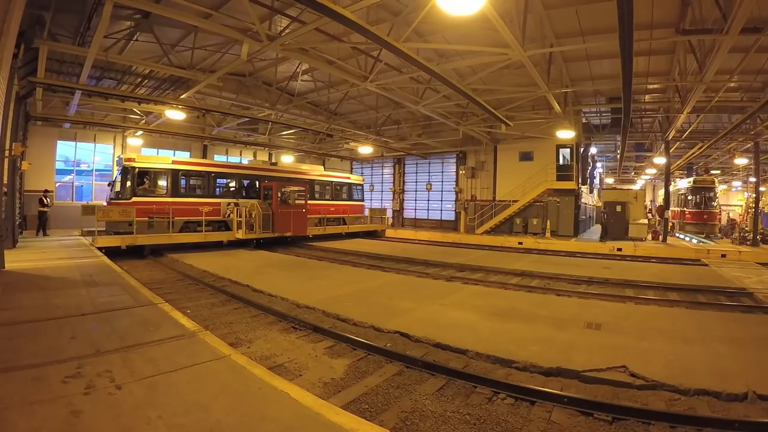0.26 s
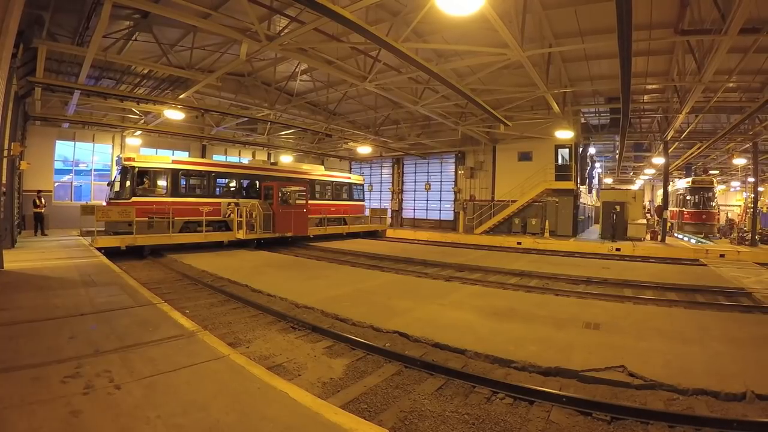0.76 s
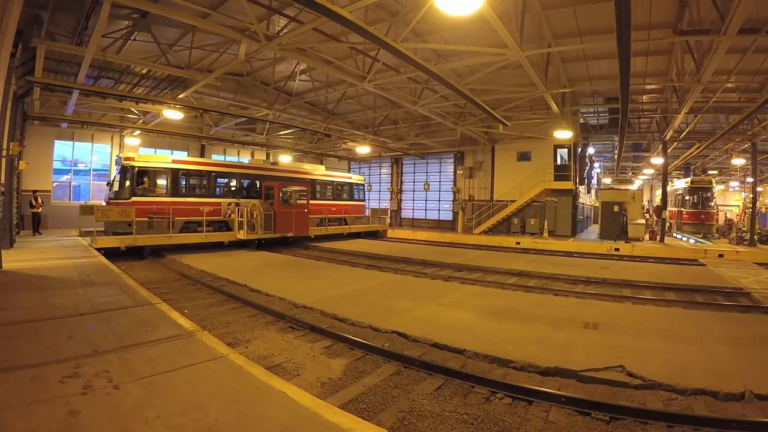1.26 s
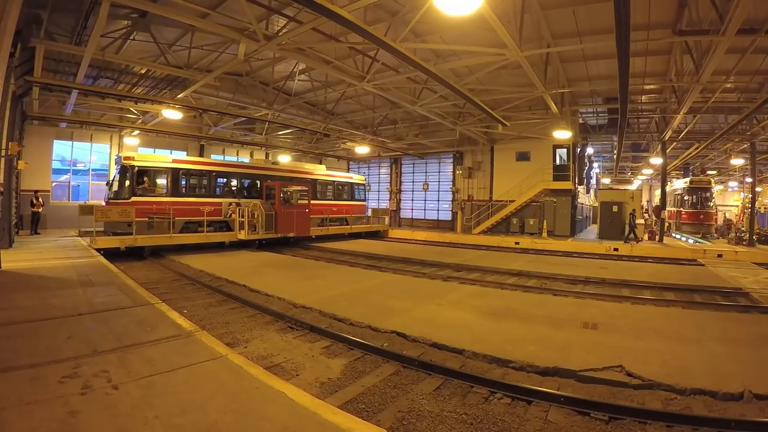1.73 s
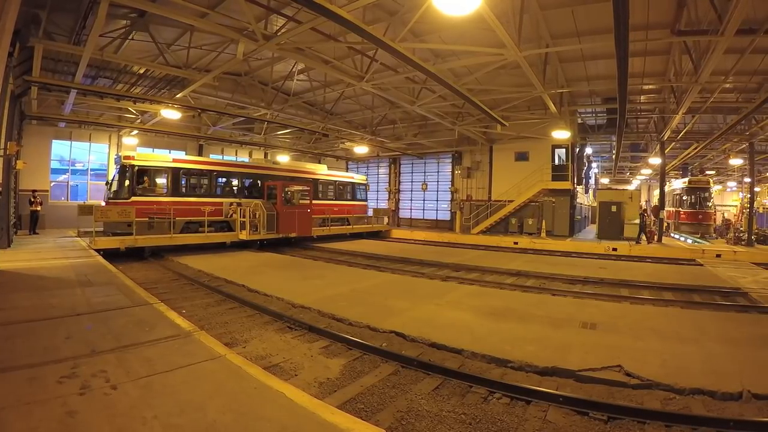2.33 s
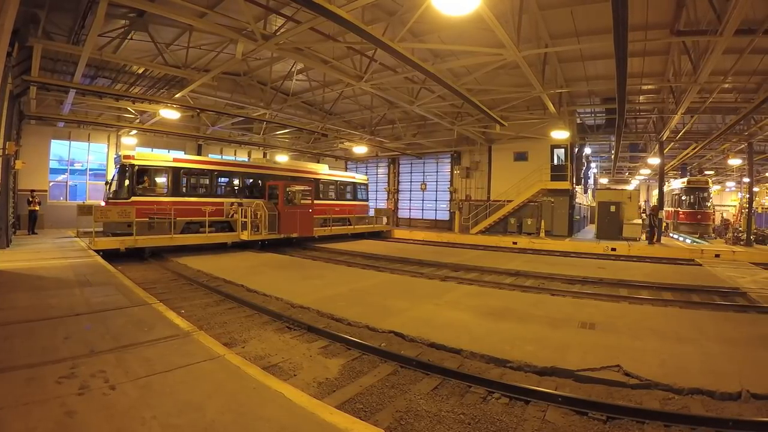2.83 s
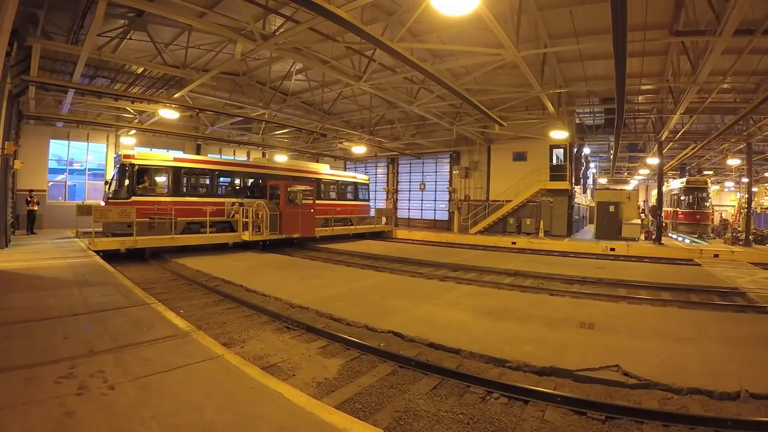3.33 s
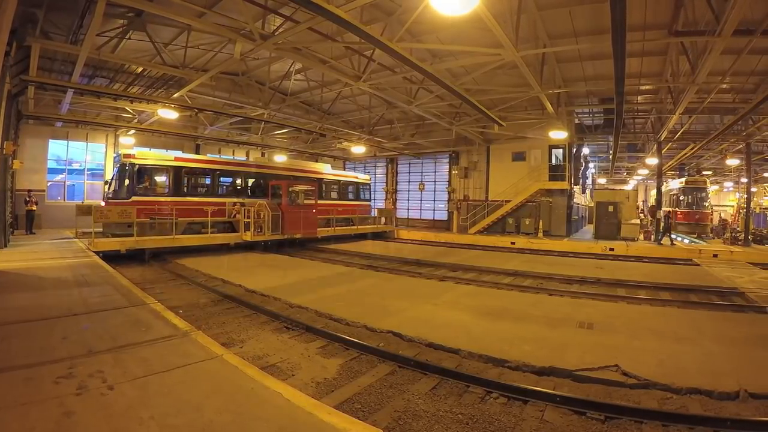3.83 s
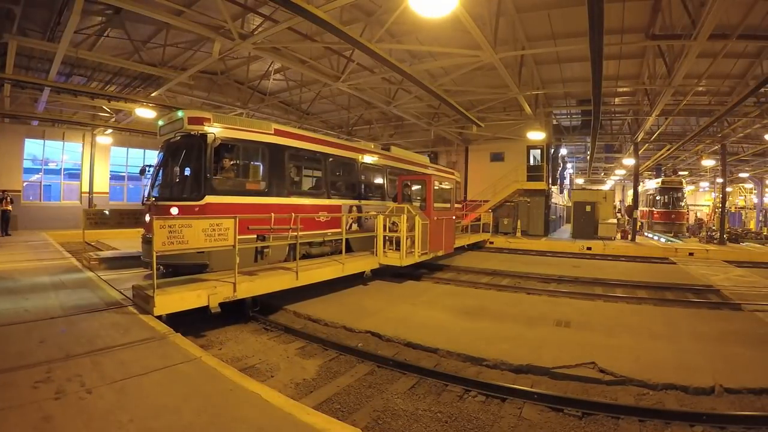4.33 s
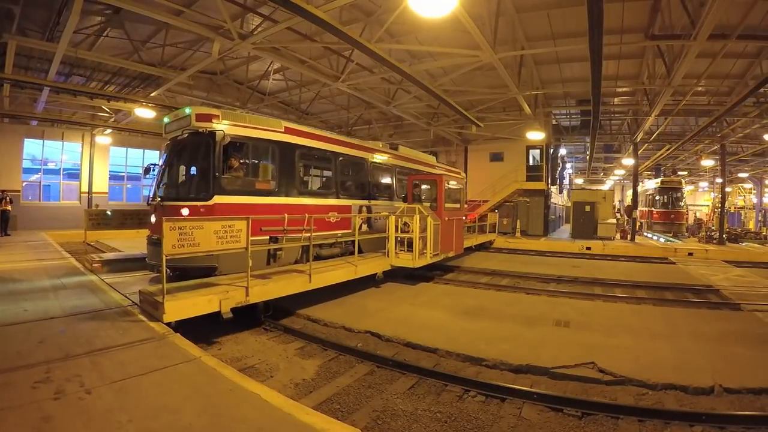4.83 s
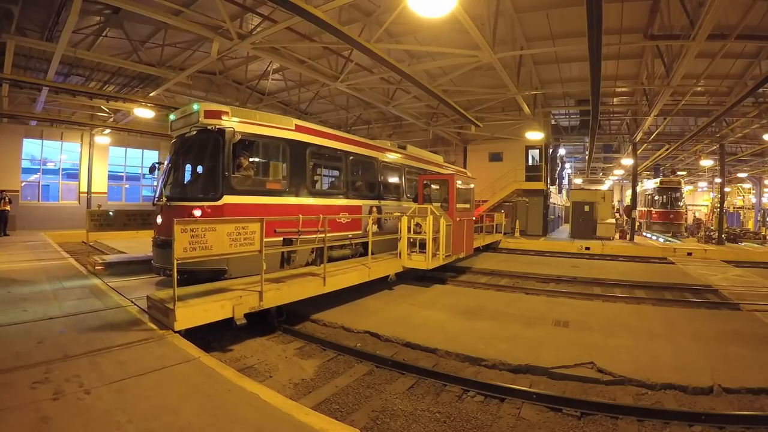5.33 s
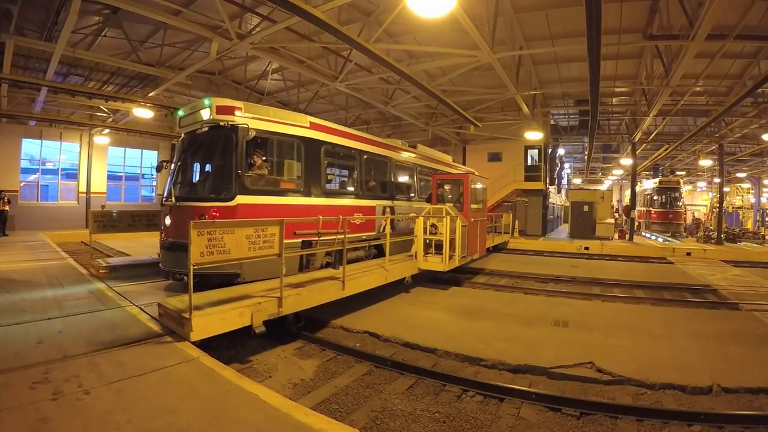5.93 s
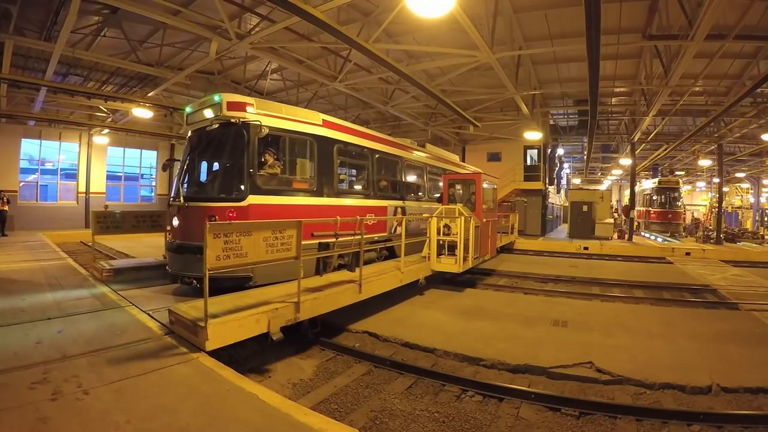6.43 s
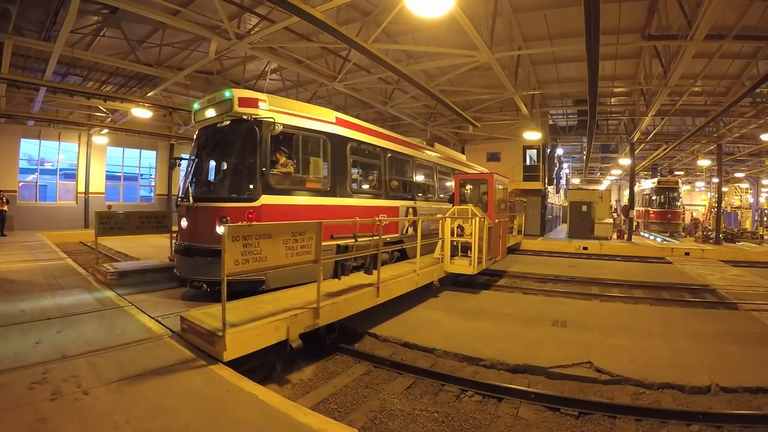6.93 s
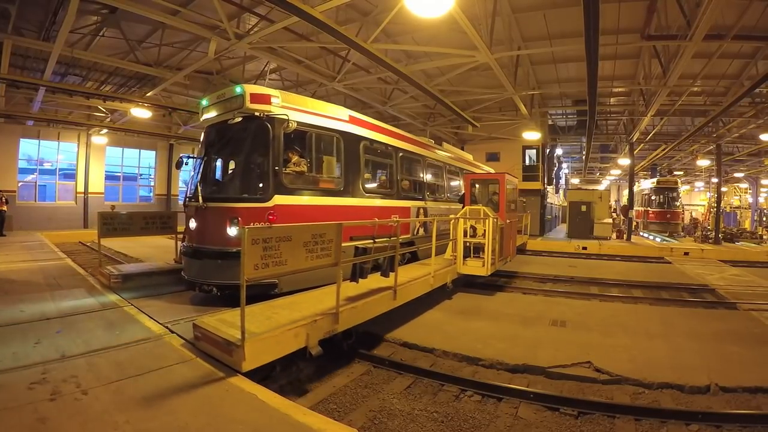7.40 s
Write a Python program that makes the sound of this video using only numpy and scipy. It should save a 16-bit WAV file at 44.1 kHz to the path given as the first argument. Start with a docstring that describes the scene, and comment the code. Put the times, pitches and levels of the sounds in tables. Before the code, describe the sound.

A fixed microphone in an echoing hall hears wavering low gear hum over deep rumble as a streetcar rides a moving table. Scattered metal clatters, a soft thud, then a very high squeal lasting about a second. Air vents in a bright burst, the rumble comes near and swells, steel rubs and rattles, a flange chirps sharply, and rolling rumble continues to the end with final clanks.

```python
"""A transfer table carries a streetcar through a workshop hall, at first far off: mesh-order tones hum over
noise rumble while an earlier squeal dies away and noise-burst clanks ring the steel deck. At 2.1 s the table
jolts over a rail joint; from 2.8 s gliding sines squeal; at 4 s an air valve puffs filtered noise.
The gears then fade and the table draws near: load swells the rumble, grainy noise rubs, clanks return,
and at 5.5 s a flange chirps. A noise tail spreads the clanks and the chirp through the hall."""
import sys
import numpy as np
from scipy import signal
from scipy.fft import rfft, irfft, next_fast_len
from scipy.io import wavfile
from scipy.ndimage import uniform_filter1d, map_coordinates

SR = 44100
rng = np.random.default_rng(int(sys.argv[2]) if len(sys.argv) > 2 else 0)


def ratio(d):
    """dB to gain"""
    e = np.asarray(d, float) / 20
    return 10 ** e


def int16_out(signal):
    """Quantize to a 16-bit WAV file."""
    q = np.round(np.clip(np.atleast_2d(signal).T, -1, 1) * 32767)
    wavfile.write(sys.argv[1], SR, q.astype(np.int16))


N = 337806
TIME = np.arange(N) / SR


def rms_one(x):
    """Scale to unit rms."""
    return x / np.sqrt(np.mean(x ** 2) + 1e-20)


def in_time(rows):
    """Columns joined by straight lines in time."""
    s, *columns = np.transpose(rows)
    return [np.interp(TIME, s, column) for column in columns]


def at_hz(points, hz):
    """Read a table on a log-frequency axis."""
    table_hz, values = np.array(points).T[:2]
    return np.interp(np.log(hz + 1), np.log(table_hz), values)


def sounding(rows, fade_s):
    """One while the table lasts, fading outside both ends."""
    return np.clip(np.minimum(TIME - rows[0][0], rows[-1][0] - TIME) / fade_s + 1, 0, 1)


def until(s, fade_s):
    """One, then fading out from a moment."""
    return np.clip((s - TIME) / fade_s + 1, 0, 1)


def swells(starts_s, lengths_s, levels_db, edge_s):
    """Sum of humps with rounded edges; those shorter than two edges peak below their level."""
    out = np.zeros(N)
    for s, length_s, db in zip(starts_s, lengths_s, levels_db):
        first, last = round((s - edge_s) * SR), round((s + length_s + edge_s) * SR)
        a, b = np.clip([first, last], 0, N)
        inside_s = np.minimum(TIME[a:b] - s, s + length_s - TIME[a:b])
        ramp = np.clip(inside_s / (2 * edge_s) + .5, 0, 1)
        out[a:b] += ratio(db) * ramp * ramp * (3 - 2 * ramp)
    return out


def drift(rate):
    """Smooth random curve through 2 * rate normal knots per second."""
    knots = rng.standard_normal(2000)
    return map_coordinates(knots, [np.clip(TIME * rate * 2 + 4, 0, 1990)], order=3)


def noise(spectrum, evenness=0):
    """Unit-rms noise of a given colour; evenness flattens its own chance swells."""
    size = next_fast_len(N)
    colour = ratio(at_hz(spectrum, np.arange(size // 2 + 1) * SR / size))
    x = irfft(rfft(rng.standard_normal(size)) * colour, size)
    if evenness:
        envelope = np.abs(signal.hilbert(x))
        x = x / (envelope + 0.19 * x.std()) ** evenness
        x = irfft(rfft(x) * (colour > colour.max() * 1e-3), size)   # back inside its band
    return rms_one(x[:N])


def resonance(x, hz, width_hz):
    """Two-pole band-pass, gain 1 on top."""
    r = np.exp(-np.pi * width_hz / SR)
    zeros = [(1 - r * r) / 2, 0, (r * r - 1) / 2]
    poles = [1, -2 * r * np.cos(2 * np.pi * hz / SR), r * r]
    return signal.lfilter(zeros, poles, x + 1e-18)


def tone(hz, level_db, waver_hz, waver_db, rate):
    """A sine, level as rms, whose pitch and level waver."""
    phase = 2 * np.pi * (np.cumsum(hz + waver_hz * drift(rate)) / SR + rng.random())
    return np.sqrt(2) * ratio(level_db + waver_db * drift(rate)) * np.sin(phase)


# The table draws near and the rails take its weight. Each row: time in s, nearness in dB, rail load in dB.
TRAVEL = [(0, 0.5, 0.5), (.6, 0.5, 0.5), (1.3, 1, -1.5), (1.8, 0.5, 2), (2.4, 1.5, 3.5), (3.1, 0.5, 0),
          (3.95, 0.5, 6), (4.2, 6, 5), (4.5, 6.5, 10.5), (5.05, 4.5, 16.5), (5.45, 7.5, 10.5),
          (5.75, 9.5, 6), (6.25, 6, 8.5), (6.7, 4, 4.5), (7.1, 6, 1.5), (7.66, 5.5, -0.5)]


def travelling(base_db, nearness_share, load_share):
    """Gain of a steady layer as nearness and load change."""
    nearness_db, load_db = in_time(TRAVEL)
    return ratio(base_db + nearness_share * nearness_db + load_share * load_db)


# Tooth-mesh rate. Each row: time in s, pitch in Hz.
MESH_RATE = [(0, 107), (.5, 104.1), (1.5, 105), (2, 101.5), (2.7, 100.5), (3.7, 101.5), (4.2, 100.6),
             (4.9, 100)]
# The teeth bite harder. Each row: start in s, length in s, second order in dB, third order against it in dB.
BITES = [(0.108, 0.044, -42.5, -27), (0.187, 0.046, -41, -36), (0.304, 0.24, -38, -10.5),
         (0.634, 0.087, -45, -3), (1.084, 0.29, -40.5, -23.5), (1.425, 0.15, -38, -22),
         (1.643, 0.04, -43, -29), (1.88, 0.21, -42, -21), (2.183, 0.15, -38, -24), (2.37, 0.033, -42, -7),
         (2.558, 0.05, -39.5, -35), (2.657, 0.13, -40, -20), (2.9, 0.18, -42.5, -21),
         (3.186, 0.073, -42.5, -20), (3.341, 0.124, -44, -23), (3.548, 0.2, -35, -16),
         (3.797, 0.26, -39.5, -39)]
# Frame hum near the mesh rate. Each row: time in s, pitch in Hz.
FRAME_PITCH = [(0, 108), (.5, 112), (.85, 102), (1.2, 110), (1.8, 100), (2.3, 108), (2.9, 114), (3.75, 115),
               (4.1, 101), (5.0, 102.5), (5.3, 110), (5.7, 102)]
# The frame hums up. Each row: start in s, length in s, level in dB.
FRAME_SWELLS = [(0.364, 0.035, -36), (0.523, 0.058, -35), (0.738, 0.037, -38.5), (0.82, 0.034, -39),
                (1.328, 0.086, -38), (2.059, 0.027, -37), (2.138, 0.26, -37), (2.66, 0.13, -42.5),
                (2.893, 0.14, -39.5), (3.059, 0.065, -37), (3.24, 0.04, -41), (3.48, 0.32, -38),
                (3.904, 0.046, -37), (4.131, 0.26, -42), (4.45, 0.18, -38.5), (4.716, 0.36, -33),
                (5.188, 0.076, -49), (5.364, 0.082, -40), (5.494, 0.054, -37), (5.578, 0.19, -33.5),
                (5.893, 0.034, -35)]


def gears():
    """Orders of the tooth-mesh frequency, swelling as the teeth bite, and the frame humming near the mesh rate."""
    idle_second_db, idle_third_db, idle_frame_db = -49, -60.5, -43
    mesh_hz, nearness_db = in_time(MESH_RATE)[0], in_time(TRAVEL)[0]
    s, length_s, db, third_db = np.transpose(BITES)
    second_gain = ratio(idle_second_db) + swells(s, length_s, db, edge_s=0.026)
    third_gain = ratio(idle_third_db) + swells(s, length_s, db + third_db, edge_s=0.067)
    second = second_gain * tone(2 * mesh_hz, 0, waver_hz=2.39, waver_db=3.0, rate=12)
    third = third_gain * tone(3 * mesh_hz, 0, waver_hz=2.446, waver_db=1.5, rate=13)
    fifth = tone(5 * mesh_hz, -76 + 2.04 * nearness_db, waver_hz=1.42, waver_db=6.0, rate=12)
    frame_gain = ratio(idle_frame_db) + swells(*np.transpose(FRAME_SWELLS), edge_s=0.045)
    frame = frame_gain * tone(in_time(FRAME_PITCH)[0], 0, waver_hz=5.3, waver_db=2.0, rate=18)
    orders = (second + third) * until(4.15, fade_s=0.32) + fifth * until(4.9, fade_s=.25)
    return orders + frame * until(5.9, fade_s=0.14)


# Wheel rumble. Each row: frequency in Hz, relative density in dB per Hz.
DEEP_COLOUR = [(9, -37.5), (15, 1), (25, -5), (40, 3), (58, -5), (75, -18), (120, -60)]
# Pit rumble. Each row: frequency in Hz, relative density in dB per Hz.
PIT_COLOUR = [(40, -24), (58, 0.5), (75, -4), (95, -6), (125, -37.5), (200, -72)]
# Frame rumble, also the jolt's. Each row: frequency in Hz, relative density in dB per Hz.
FRAME_COLOUR = [(60, -34), (95, -6), (123, -6), (182, -10), (216, -12), (260, -14.5), (320, -20.5),
                (370, -25), (430, -28.5), (560, -50), (730, -65.5)]
# The wheels labour and the deep rumble swells. Each row: start in s, length in s, level in dB.
LURCHES = [(2.307, 0.024, -28.5), (4.007, 0.067, -40), (4.222, 0.1, -30), (4.546, 0.041, -29.5),
           (4.628, 0.14, -34), (4.88, 0.056, -34), (4.967, 0.036, -42), (5.154, 0.043, -39),
           (5.27, 0.042, -29), (5.36, 0.15, -30.5), (5.589, 0.028, -22.5), (5.678, 0.065, -21.5),
           (5.804, 0.178, -36.5), (6.074, 0.15, -32.5), (6.252, 0.11, -31.5), (6.815, 0.043, -28),
           (6.892, 0.044, -29), (6.972, 0.032, -28.5), (7.039, 0.17, -30), (7.293, 0.15, -29),
           (7.518, 0.14, -31)]


def rumble():
    """Wheels, pit and frame of the loaded table: three low noises whose levels follow its travel."""
    deep_gain = travelling(-37.5, nearness_share=0, load_share=0.35)
    deep_gain = deep_gain + swells(*np.transpose(LURCHES), edge_s=0.036)
    deep = deep_gain * noise(DEEP_COLOUR, evenness=0.54)
    pit_gain = travelling(-41.5, nearness_share=0.4, load_share=0.42) * ratio(0.75 * drift(2.5))
    pit = pit_gain * noise(PIT_COLOUR, evenness=0.17)
    frame_gain = travelling(-41.5, nearness_share=0.44, load_share=0.31)
    return deep + pit + frame_gain * noise(FRAME_COLOUR, evenness=0.48)


# Two wheel modes, the lower sliding with the load.
# Each row: time in s, upper pitch in Hz, upper level in dB, lower pitch in Hz, lower level in dB.
SQUEAL = [(2.82, 7960, -75, 4260, -90), (2.87, 7900, -61.5, 4320, -76), (3.04, 7870, -55, 4260, -61.5),
          (3.25, 7842, -49.5, 4010, -65), (3.42, 7810, -50, 3930, -71), (3.54, 7760, -50, 3950, -70),
          (3.65, 7840, -52, 4280, -62), (3.78, 7825, -67.5, 4185, -77), (3.9, 7785, -80, 4185, -95)]


def squeals():
    """Stick-slip holds wheel modes singing; the contact mixes two of them into a sum tone."""
    mirror_hz, mirror_share, mirror_s = 12100, .8, 3.1
    upper_hz, upper_db, lower_hz, lower_db = in_time(SQUEAL)
    sum_hz = upper_hz + lower_hz
    upper = tone(upper_hz, upper_db, waver_hz=20.4, waver_db=3.5, rate=55)
    lower = tone(lower_hz, lower_db, waver_hz=28.1, waver_db=3.5, rate=80)
    mixed = tone(sum_hz, upper_db - 19.5, waver_hz=20.4, waver_db=4.0, rate=46)
    # from mirror_s a second tone slides against the sum, by mirror_share of its distance from mirror_hz
    opposed_hz = mirror_hz - mirror_share * (sum_hz - mirror_hz)
    mirror = tone(opposed_hz, upper_db - 25, waver_hz=25.0, waver_db=2.0, rate=46)
    mirror = mirror * (1 - until(mirror_s, fade_s=.06))
    # an earlier squeal dies away at 109 dB per s
    tail = tone(7860, -59.5 - 109 * TIME, waver_hz=20.5, waver_db=4.5, rate=55)
    return (upper + lower + mixed + mirror) * sounding(SQUEAL, fade_s=.015) + tail


# Steel blows.
# Each row: start in s, level in dB, dullness in dB per octave, rise in s, deck ring against the clatter in dB.
CLANKS = [(0.63, -54.5, 4, 0.01, -18), (1.214, -38.5, 2.5, 0.028, -22), (1.516, -56.5, -2, 0.01, -17),
          (1.839, -51, 4.5, 0.034, -15), (4.327, -38.5, 1, 0.01, -13), (4.525, -47.5, -2, 0.0096, -8),
          (4.795, -55, 3, .012, -7.5), (5.629, -41.5, 10, 0.011, -15.5), (6.436, -52.5, 3, 0.013, -13),
          (6.695, -47.5, 3, 0.013, -13.5), (7.335, -45.5, 11, 0.0079, -21), (7.44, -38.5, 0, 0.018, -15)]
# Loose steel rattling. Each row: frequency in Hz, relative density in dB per Hz.
CLATTER_COLOUR = [(900, -30), (1500, -6.5), (2000, -15), (2700, -7), (3400, -16), (4200, -3), (5200, -4.5),
                  (6500, 0), (7500, -9), (9000, -16), (11500, -35), (15000, -48)]
# Steel deck modes. Each row: frequency in Hz, relative level in dB, ring scale in s (bandwidth in Hz is 5.5 over it).
DECK = [(2196, -6, 0.13), (2436, -8.5, 0.13), (3670, -2.5, .06), (4950, -25, 0.046), (4856, -0.5, 0.42),
        (5400, -1, .08), (6600, -27, .06)]


def clanks():
    """Each blow swells a noise clatter of loose parts; the same burst, uncoloured, rings the deck modes."""
    decay_s, ragged_db = 0.048, 2.5
    out, size = np.zeros(N + SR), SR // 4
    t, hz = np.arange(size) / SR, np.arange(size // 2 + 1) * SR / size
    many_modes_db = 3.8 * rms_one(uniform_filter1d(rng.standard_normal(len(hz)), size=10))   # dense small resonances
    ragged = ratio(ragged_db * drift(45))   # the parts touch unevenly
    for s, db, dull, rise_s, ring_db in CLANKS:
        white = rng.standard_normal(size)
        shape = (1 - np.exp(-(t / rise_s) ** 2)) * np.exp(-t / decay_s)
        shape = shape * np.interp(s + t, TIME, ragged)
        tilt_db = -dull * np.log2((hz + 100) / 4000)
        colour = ratio(at_hz(CLATTER_COLOUR, hz) + tilt_db + many_modes_db)
        clatter = rms_one(irfft(rfft(white) * colour, size)) * shape
        modes = np.zeros(size)
        for mode_hz, mode_db, ring_s in DECK:
            gain = ratio(mode_db + 2 * rng.standard_normal()) * np.sqrt(ring_s * 4000)
            modes += gain * resonance(white * shape, mode_hz, 5.5 / ring_s)
        start = round(s * SR)
        out[start:start + size] += ratio(db) * (clatter + ratio(ring_db) * modes)
    return out[:N]


# Flange modes. Each row: frequency in Hz, pitch waver in Hz, level within the chirp in dB.
CHIRP_MODES = [(3080, 68, -26.5), (3770, 35, -15), (3970, 27, -21.5), (4450, 100, -26), (6200, 49, -18),
               (6580, 30, -11.5), (6784, 28, 1.5), (7130, 24, -23), (13560, 60, -35)]
# Scraping noise of the slip. Each row: frequency in Hz, relative density in dB per Hz.
SCRAPE_COLOUR = [(2300, -19), (3000, -13), (4300, -4.5), (5200, -13), (6200, -3.5), (7200, -2), (8600, -20),
                 (9300, -34), (10200, -12.5), (11500, -37), (12800, -24), (15000, -40.5)]


def chirp():
    """A flange slips for a moment: its modes sing evenly over a scrape that is strongest near the start."""
    start_s, length_s, level_db = 5.475, 0.045, -25.5
    since_s = TIME - start_s
    attack = np.clip(since_s / .008, 0, 1)
    slip = attack * np.clip((length_s - since_s) / 0.016 + 1, 0, 1)
    modes = sum(tone(hz, db, waver_hz=waver_hz, waver_db=0.5, rate=61) for hz, waver_hz, db in CHIRP_MODES)
    scrape = ratio(-9.0) * noise(SCRAPE_COLOUR) * attack * np.exp(-np.abs(since_s) / 0.041)
    return ratio(level_db) * (modes * slip + scrape)


# Air burst. Each row: frequency in Hz, relative density in dB per Hz.
AIR_COLOUR = [(1760, -37), (3000, -18), (3170, -28), (3250, -19.5), (4710, -11.5), (5970, 3), (8650, -13.5),
              (10800, -32), (15000, -40.5)]
# Thin bright jet. Each row: frequency in Hz, relative density in dB per Hz.
JET_COLOUR = [(5000, -20), (8500, 5), (12000, -7), (15000, -6)]


def puff():
    """Compressed air vents in one bright burst: the valve opens, then the pressure drains."""
    start_s, rise_s, level_db, drain_db_per_s = 4.005, 0.043, -34, 65.5
    jet_s, jet_db = 0.082, -57   # the jet holds while the valve stands open
    since_s = np.maximum(TIME - start_s, 0)
    opening = 1 - np.exp(-(since_s / rise_s) ** 2)
    burst = ratio(level_db - drain_db_per_s * since_s) * noise(AIR_COLOUR)
    jet = ratio(jet_db) * until(start_s + jet_s, fade_s=.04) * noise(JET_COLOUR)
    return opening * (burst + jet)


# Wheel flanges rub close by. Each row: start in s, length in s, level in dB.
RUSTLE = [(4.806, .18, -55), (5.065, .2, -50), (5.305, 0.27, -55.5), (5.75, 0.43, -56), (6.144, 0.45, -60),
          (6.83, .15, -50.5), (6.998, 0.25, -53), (7.22, 0.22, -53.5)]
# Rubbing steel. Each row: frequency in Hz, relative density in dB per Hz.
RUB_COLOUR = [(1760, -13), (3000, -11), (3520, -12), (4710, -7.5), (5140, -2), (6350, -7.5), (6860, -9.5),
              (9000, -23.5), (11700, -65), (19800, -120)]


def rustle():
    """Rubbing steel: grainy noise with two faint singing bands."""
    grain = noise(RUB_COLOUR) * ratio(0.37 * drift(40))
    singing = resonance(grain, 4890, 90) * ratio(-6.5)
    grain = grain + singing
    grain = grain + resonance(grain - singing, 5862, 200) * ratio(-10)
    return grain * swells(*np.transpose(RUSTLE), edge_s=0.1)


def jolt():
    """The table rolls over a rail joint: a dull boom of the whole frame, noise through one low resonance."""
    start_s, rise_s, hold_s, level_db, decay_db_per_s = 2.13, 0.022, 0.14, -32.5, 58
    boom = rms_one(resonance(noise(FRAME_COLOUR), 130, 78))
    since_s = TIME - start_s
    decay = ratio(level_db - decay_db_per_s * np.maximum(since_s - hold_s, 0))
    return np.clip(since_s / rise_s, 0, 1) * decay * boom


# Far machinery. Each row: frequency in Hz, relative density in dB per Hz.
MACHINERY_COLOUR = [(260, -17.5), (450, -15.5), (500, 0.5), (531, -30), (605, -10.5), (785, -6.5),
                    (1140, -15), (1340, -8.5), (2270, -14.5), (2820, -19), (3600, -30), (4680, -80.5),
                    (7920, -120)]
# Rail hiss. Each row: frequency in Hz, relative density in dB per Hz.
HISS_COLOUR = [(1760, -11), (3000, -10.5), (3460, -9), (4200, -1), (5920, -1), (6960, -6), (8020, -13),
               (8870, -11), (11800, -22), (13400, -30), (15100, -43)]


def wash():
    """Machinery and rail hiss: two steady noises that drift in level and grow with nearness."""
    machinery_gain = travelling(-62.5, nearness_share=1.01, load_share=0) * ratio(0.49 * drift(5.5))
    hiss_gain = travelling(-62, nearness_share=0.57, load_share=0) * ratio(0.84 * drift(6.6))
    return machinery_gain * noise(MACHINERY_COLOUR) + hiss_gain * noise(HISS_COLOUR)


# Hall reverberation. Each row: frequency in Hz, 60 dB decay time in s.
HALL_DECAY = [(500, 0.52), (2000, 1.33), (5000, 0.8), (9000, 0.51), (14000, 0.22)]


def hall(x, onset_s):
    """Diffuse tail: half-octave bands of noise that build up together and die at their own rates."""
    t, tail = np.arange(SR) / SR, 0
    for hz in 500 * 2. ** np.arange(0, 5, .5):
        band = signal.butter(2, [hz / 1.19, hz * 1.19], "band", fs=SR, output="sos")
        decay = ratio(-60 * t / at_hz(HALL_DECAY, hz))
        tail = tail + signal.sosfilt(band, rng.standard_normal(SR)) * decay
    tail = tail * (1 - np.exp(-t / onset_s))
    return signal.fftconvolve(x, tail / np.sqrt(np.sum(tail ** 2)))[:N]


def scene():
    """All sources summed; chirp and clanks are heard both directly and through the hall."""
    slip, blows = chirp(), clanks()
    slip = slip + ratio(-9.5) * hall(slip, onset_s=0.0074)
    blows = blows + ratio(-8.5) * hall(blows, onset_s=0.018)
    mix = gears() + rumble() + squeals() + blows + slip + puff() + rustle() + jolt() + wash()
    return mix[None]


def low_pass(x):
    """Removes everything above the highest recorded frequency."""
    return signal.sosfilt(signal.butter(12, 15190, fs=SR, output="sos"), x)


# Dark bands in the colour at the microphone. Each row: centre in Hz, width in Hz, depth from 0 to 1.
DARK_BANDS = [(547, 126, 0.55), (1031, 48, 1), (1125, 62, 1)]


def record(dry):
    """A soft end, then narrow dark bands cut by subtracting resonances."""
    x = dry * np.clip((TIME[-1] - TIME) / .01, 0, 1)
    for hz, width_hz, depth in DARK_BANDS:
        x = x - depth * resonance(x, hz, width_hz)
    return low_pass(x)


dry = scene()
out = record(dry)
int16_out(out)
```